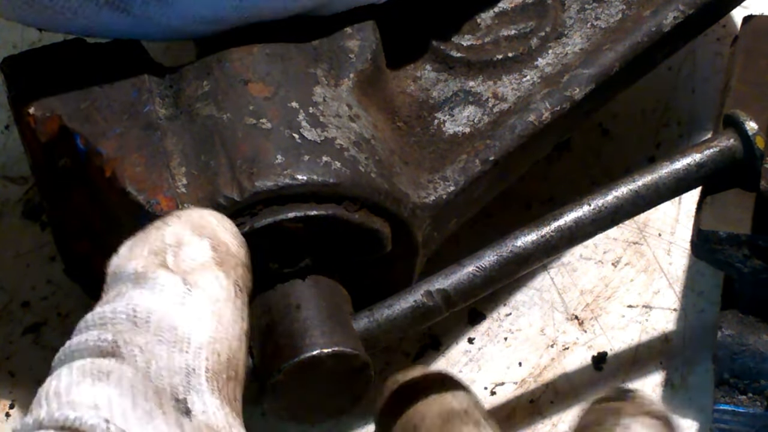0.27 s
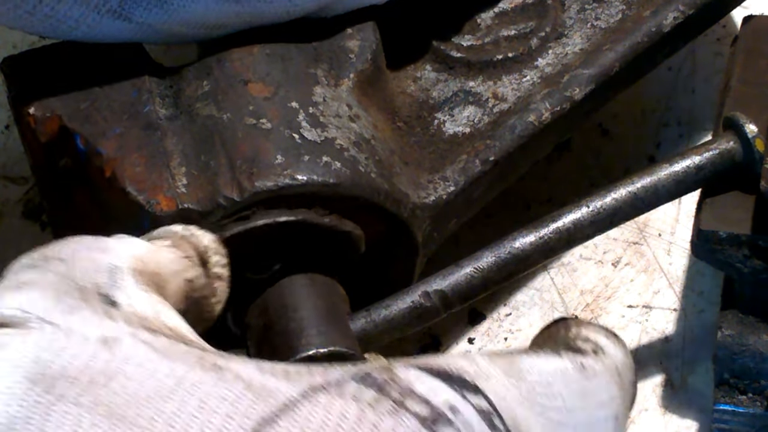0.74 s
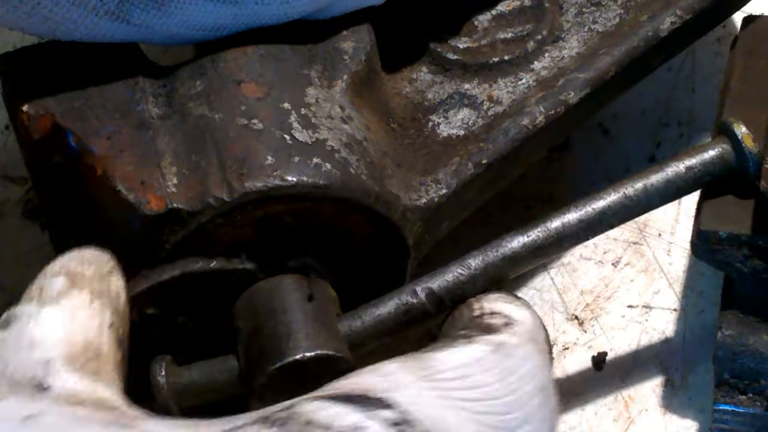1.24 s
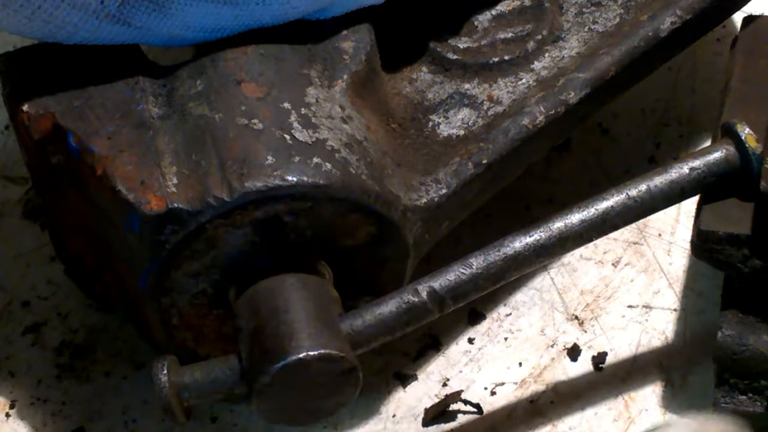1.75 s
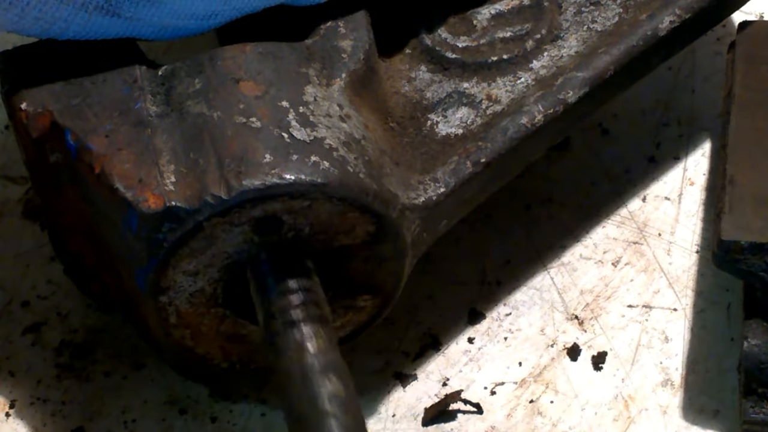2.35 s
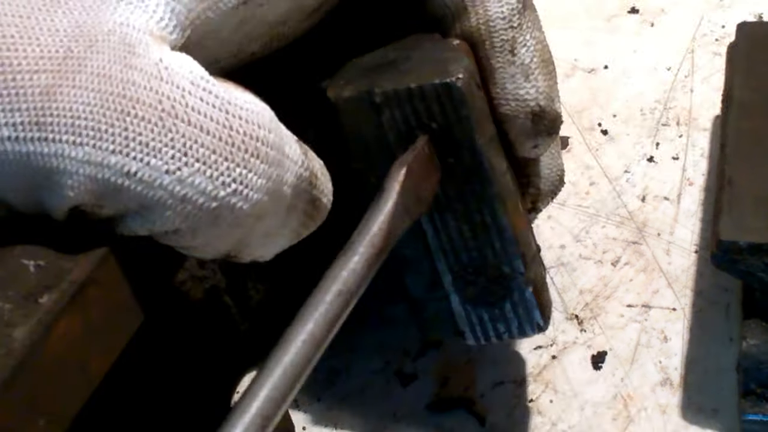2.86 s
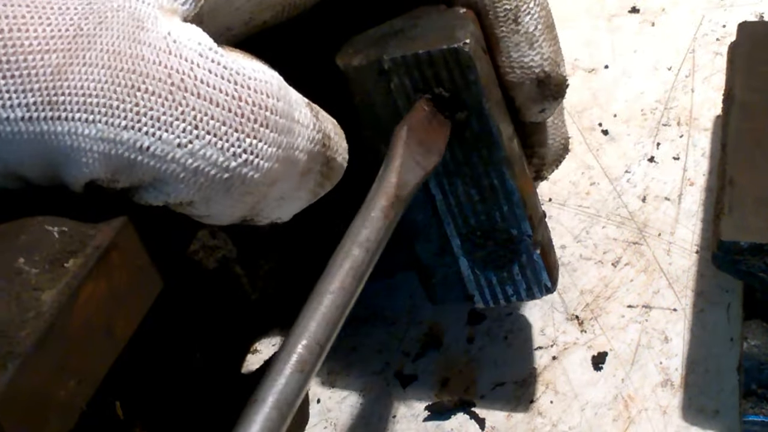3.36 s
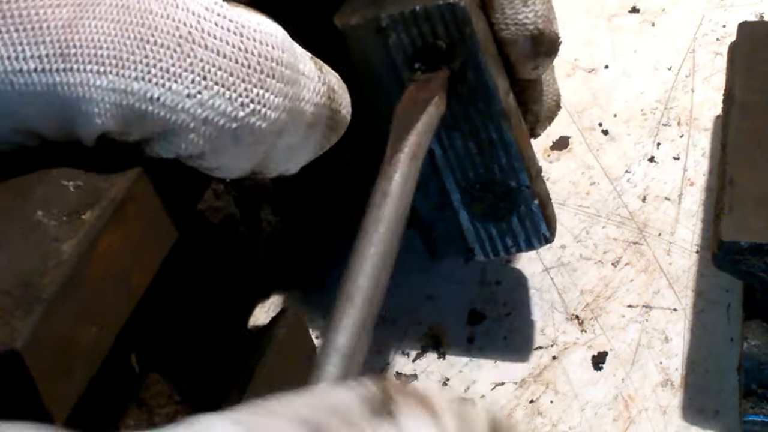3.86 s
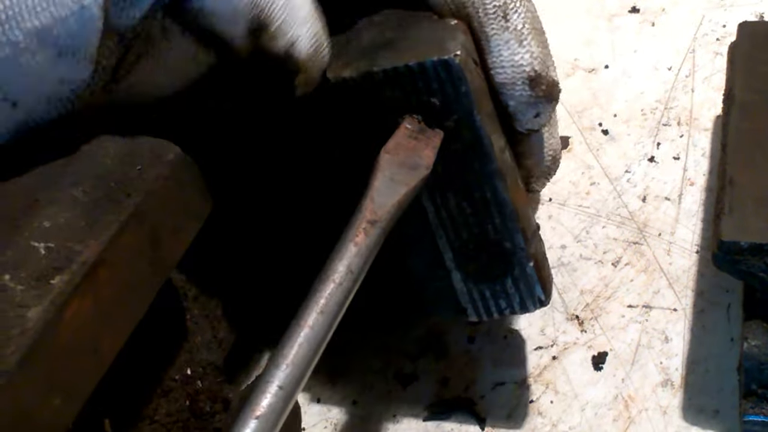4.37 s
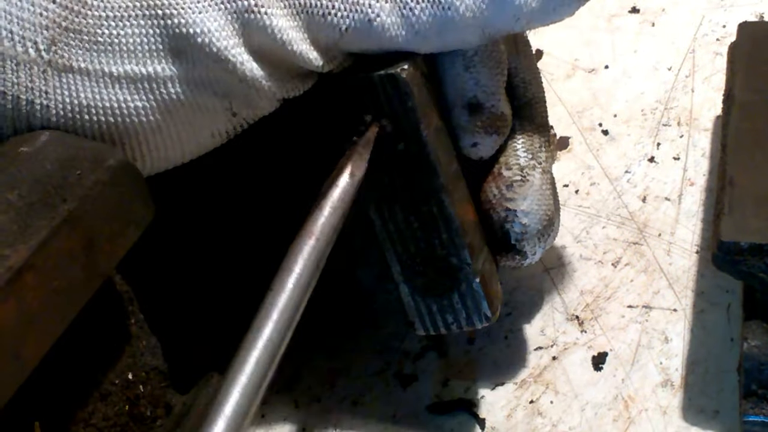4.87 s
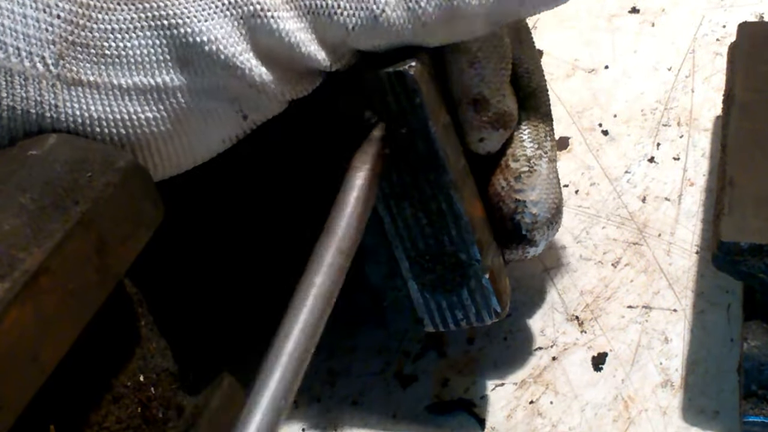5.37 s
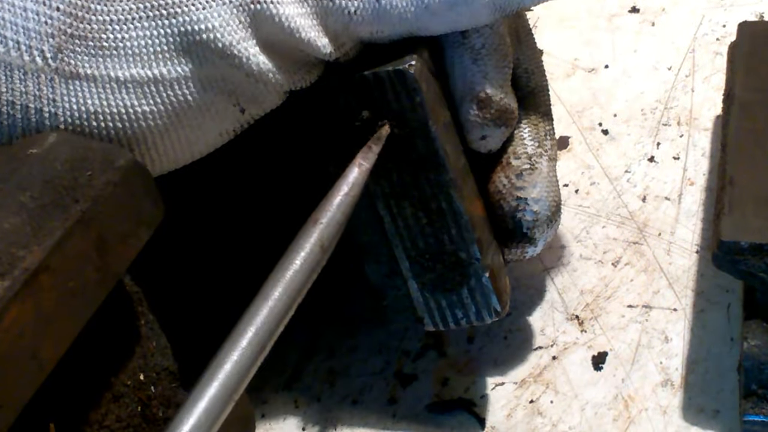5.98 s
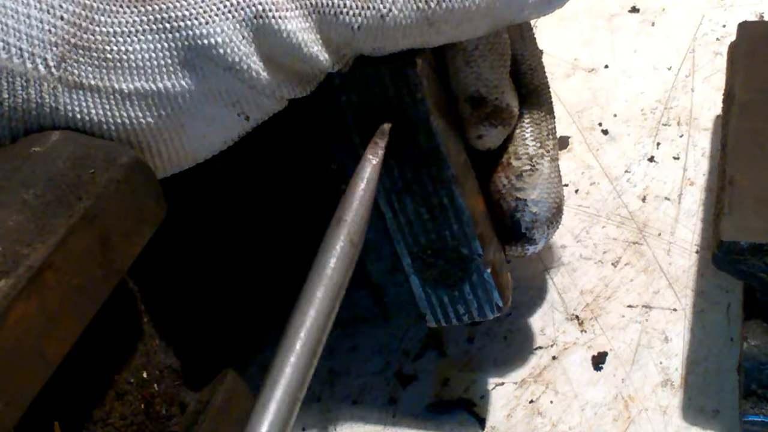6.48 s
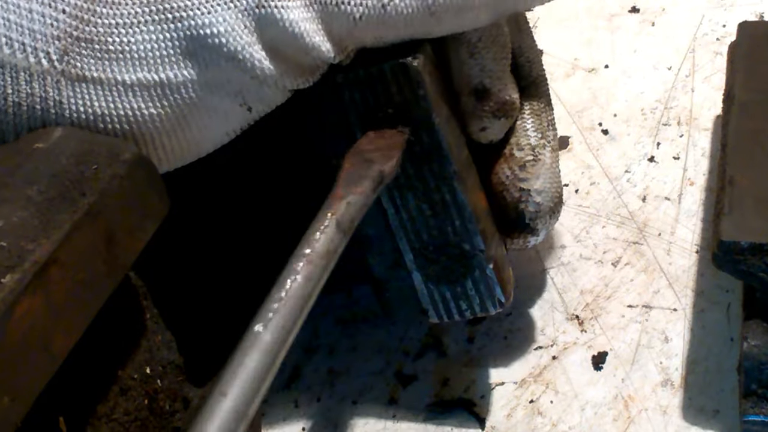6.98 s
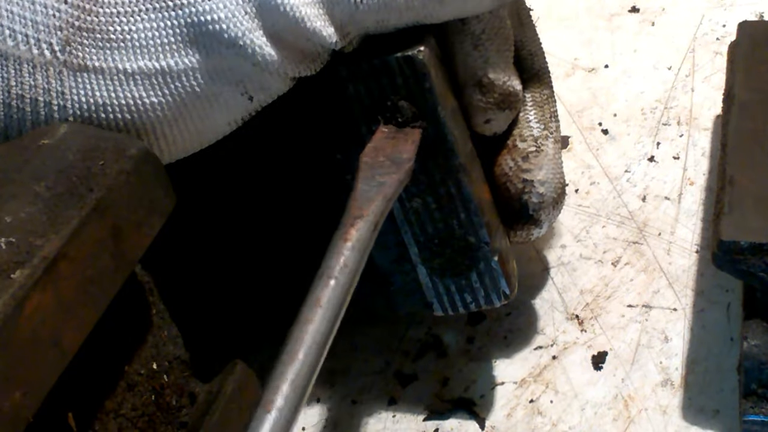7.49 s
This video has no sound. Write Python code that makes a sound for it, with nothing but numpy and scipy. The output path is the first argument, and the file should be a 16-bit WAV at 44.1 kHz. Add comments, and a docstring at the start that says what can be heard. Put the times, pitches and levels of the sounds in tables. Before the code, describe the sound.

Sharp metallic clatter over traffic rumble, then irregular clicks, dull wooden thuds and short gritty scrapes of a screwdriver tip on heavy iron.

```python
"""Vise and screwdriver on a bench

Gloved hands slide a washer and a screw out of a vise, then a screwdriver picks and scrapes at a serrated
steel jaw on a wooden bench. Blows are noise bursts and dying modes, strokes are filtered dense grit.
Behind them are four layers of street noise, gliding engine tones and faint electronic hiss."""
import sys
import numpy as np
from scipy import signal
from scipy.fft import rfft, irfft
from scipy.io import wavfile
from scipy.ndimage import uniform_filter1d

SR = 44100
rng = np.random.default_rng(int(sys.argv[2]) if len(sys.argv) > 2 else 0)


def pcm_store(signal):
    """Save signal as 16-bit PCM."""
    levels = np.round(np.clip(np.atleast_2d(signal), -1, 1) * 32767)
    wavfile.write(sys.argv[1], SR, levels.astype(np.int16).T)


N = 341334
# work goes from vise to loose jaw; the scene changes here and the street steps in level
MOVE_S = 2.79


def gain_of(db):
    """Decibels to amplitude."""
    return 10 ** (np.asarray(db) / 20)


def evened(x):
    """Scales to rms 1."""
    return x / np.sqrt(np.mean(x ** 2) + 1e-20)


def crest(x):
    """Scales a transient so that its loudest 300 samples have level 1, as a sine of amplitude 1."""
    return x / np.sqrt(2 * uniform_filter1d(x ** 2, size=300).max())


def wander(size, smooth):
    """Slow random curve of rms 1: noise averaged over smooth samples."""
    return evened(uniform_filter1d(rng.standard_normal(size), size=smooth))


def read(points, hz):
    """Reads a spectrum in dB on a log-frequency axis."""
    point_hz, point_db = np.transpose(points)
    return np.interp(np.log(hz + 1), np.log(point_hz + 1), point_db)


def shaped(x, points):
    """Filters x by a spectrum."""
    hz = np.fft.rfftfreq(len(x), 1 / SR)
    return irfft(rfft(x) * gain_of(read(points, hz)), len(x))


def add(mix, start_s, sound):
    """Mixes a sound in, cut at the end of the mix."""
    part = mix[round(start_s * SR):][:len(sound)]
    part += sound[:len(part)]


def ring(modes, detune, size):
    """Sum of exponentially dying sines, each pitch scaled by its detune factor."""
    t = np.arange(size) / SR
    out = np.zeros(size)
    for (hz, db, t60_s), factor in zip(modes, detune):
        out += gain_of(db - 60 * t / t60_s) * np.sin(2 * np.pi * hz * factor * t)
    return out


# Hand-damped steel, too many modes to count: envelopes of its knock and tick.
# Each row: frequency in Hz, relative density in dB per Hz.
KNOCK_SPECTRUM = [(500, -18), (900, 3), (1300, 5.5), (1800, 1.5), (2600, -2.5), (3800, -13.5),
                  (8000, -52.5)]
TICK_SPECTRUM = [(1800, -26), (3000, 5.5), (4000, 6), (5500, -1), (6500, -10), (7800, -24), (11000, -29.5),
                 (16000, -45.5)]
RISE_S, TICK_LAG_S = 0.0055, 0.001
SNAP_DB = 18  # one hard contact, re the rms of the tiny ones
JAW_PING_DB, VISE_PING_DB, PING_T60_S = -2, -7, 0.03  # heavy iron hardly pings


def steel(on_vise, knock_hz, burst, build):
    """Tiny contacts and a snap excite dense steel modes, one mode pings; the treble follows as the tip skids."""
    t = np.arange(len(burst)) / SR
    snap = gain_of(SNAP_DB) * (np.arange(len(t)) == round(RISE_S * SR))
    contacts = rng.standard_normal((2, len(t))) + snap
    ping = build * ring([(knock_hz, 0, PING_T60_S)], [1], len(t))
    ping_gain = gain_of(VISE_PING_DB if on_vise else JAW_PING_DB)
    knock = crest(shaped(contacts[0], KNOCK_SPECTRUM) * burst) + ping_gain * crest(ping)
    tick = shaped(contacts[1], TICK_SPECTRUM) * np.interp(t - TICK_LAG_S, t, burst)
    return knock, tick


# Jaw on wood, and vise body. Each row: frequency in Hz, relative density in dB per Hz.
JAW_ON_WOOD = [(140, -24), (250, 3), (400, -1.5), (600, -4), (850, -9.5), (1300, -26.5), (4000, -68)]
VISE_BODY = [(140, -40), (280, 1.5), (420, 2), (570, 8.5), (850, 1), (1300, -14.5), (4000, -66)]
# Modes of the vise body. Each row: frequency in Hz before detuning, relative level in dB, t60 in s.
VISE_MODES = [(330.5, -4, 0.028), (434, -2, 0.023), (590, -0.5, 0.028), (720, -4, 0.018)]
VISE_MODES_DB = -1  # re the body noise


def clonk_of(on_vise, burst, build):
    """The push rattles iron or wood, which dies later than the steel; the vise adds its own modes."""
    snap = gain_of(SNAP_DB) * (np.arange(len(burst)) == round(RISE_S * SR))
    contacts = rng.standard_normal(len(burst)) + snap
    clonk = crest(shaped(contacts, VISE_BODY if on_vise else JAW_ON_WOOD) * burst ** 0.65)
    if on_vise:
        detune = 1 + 0.023 * rng.standard_normal(len(VISE_MODES))
        modes = build * ring(VISE_MODES, detune, len(burst))
        clonk = clonk + gain_of(VISE_MODES_DB) * crest(modes)
    return clonk


# Bench top. Each row: share of the thud pitch, relative level in dB, t60 in s.
BENCH_TOP = [(1.048, 4.5, 0.086), (1.613, -4, 0.063), (0.735, -4.5, 0.11)]
# Low rumble around a blow. Each row: frequency in Hz before detuning, relative level in dB, t60 in s.
LOW_RUMBLE = [(58.5, -7, 0.26), (80, -8.5, 0.13)]
LOW_LAG_S = 0.003


def thud_and_rumble(thud_hz, size):
    """Modes of the bench top and a lower rumble build up over the push and start a little late."""
    slow = 1 - np.exp(-np.arange(size) / SR / (0.89 * RISE_S))
    top_modes = [(share * thud_hz, db, t60_s) for share, db, t60_s in BENCH_TOP]
    detune = 1 + 0.039 * rng.standard_normal(len(LOW_RUMBLE))
    thud = -slow * ring(top_modes, np.ones(len(BENCH_TOP)), size)
    rumble = -slow * ring(LOW_RUMBLE, detune, size)
    lag = round(LOW_LAG_S * SR)
    return [np.pad(part, (lag, 0))[:size] for part in (thud, rumble)]


# Each row: time in s (3 ms after onset), steel knock in dB, ping pitch in Hz, steel tick in dB,
# burst t60 in s, clonk in dB, bench thud in dB, thud pitch in Hz,
# low rumble around the blow in dB (for early and weak blows mostly traffic).
BLOWS = [(0.0912, -32.5, 2630, -34, 0.062, -53, -50, 137, -49),
         (0.0967, -29.5, 2730, -31.5, 0.038, -36.5, -61, 135, -48),
         (0.4092, -57, 2186, -52, 0.11, -64, -62, 102, -40.5),
         (1.462, -25.5, 3900, -36, 0.039, -14, -34, 209, -27),
         (1.4725, -38, 2600, -52, 0.035, -34, -60, 200, -55),
         (1.514, -19.5, 1106, -27.5, 0.06, -21, -31, 105, -34),
         (1.5403, -38.5, 895, -61, 0.18, -27.5, -51, 102, -29),
         (1.569, -36, 1296, -66, 0.037, -23.5, -50, 102, -28.5),
         (1.6054, -41.5, 1170, -76, 0.072, -35, -34, 167, -45),
         (1.64, -50, 1190, -77, 0.032, -40, -60, 160, -58),
         (1.6794, -27, 1348, -36.5, 0.064, -28.5, -37, 159, -41),
         (1.753, -37, 2310, -51, 0.16, -38, -49, 102, -33),
         (1.783, -36, 1790, -54, 0.061, -31.5, -40, 174, -41),
         (1.8143, -40, 844, -64, 0.041, -32.5, -40, 167, -42),
         (1.854, -69, 1160, -46.5, 0.11, -51, -41, 102, -42),
         (1.8926, -48, 1390, -55, 0.071, -46, -50, 135, -48),
         (2.0062, -46, 1324, -48, 0.27, -39.5, -55, 101, -43),
         (2.988, -55, 1170, -60, 0.058, -37, -24.5, 129, -39),
         (2.994, -46.5, 1555, -54, 0.079, -39, -23, 122, -22),
         (3.069, -74, 1150, -81, 0.031, -43.5, -28, 109, -25),
         (3.1554, -28, 1240, -37.5, 0.045, -35, -57, 101, -24.5),
         (3.181, -48, 1150, -50.5, 0.043, -36.5, -25, 110, -25.5),
         (3.4527, -37, 1860, -36, 0.052, -23, -10, 110.6, -12),
         (3.5495, -59, 1430, -62, 0.08, -57, -46.5, 151, -36),
         (3.621, -65, 1240, -56, 0.041, -60, -41, 109.5, -45),
         (3.729, -33.5, 1790, -34.5, 0.065, -24, -12, 156.6, -12),
         (3.772, -58, 1580, -66, .065, -45, -21.5, 96.5, -29),
         (3.843, -39.5, 1430, -65, 0.065, -51, -29, 98, -47),
         (3.857, -29, 1600, -60, 0.042, -34.5, -20.5, 110, -24),
         (4.0961, -45.5, 1190, -56, 0.028, -46, -37, 126, -28.5),
         (4.1329, -52, 1550, -72, 0.088, -46, -28, 135.5, -55),
         (4.1694, -52.5, 1760, -74, 0.093, -43, -26, 99, -51),
         (4.209, -62, 1415, -58, 0.057, -61, -39.5, 135, -55),
         (4.422, -51, 1390, -52, 0.15, -39.5, -24.5, 111, -43),
         (4.4417, -47, 1500, -61, 0.073, -50, -24.5, 93, -52),
         (4.6936, -54, 1990, -63, 0.13, -54, -55, 101, -34),
         (4.796, -43.5, 1150, -48.5, 0.066, -37.5, -19, 116, -19.5),
         (4.86, -26.5, 1545, -40, 0.043, -30.5, -24.5, 114, -20.5),
         (5.086, -51.5, 1220, -64, 0.071, -45, -63, 164, -33),
         (5.2132, -52.5, 2290, -60, 0.092, -61, -46, 99, -31),
         (5.243, -49, 1110, -49, 0.034, -55, -21, 110, -15.5),
         (5.253, -43.5, 1270, -56, 0.04, -37.5, -50, 103, -26),
         (5.3357, -32, 1430, -33.5, 0.035, -34.5, -28, 117, -23.5),
         (5.354, -54, 1140, -64, 0.039, -42, -32.5, 100, -22.5),
         (5.473, -45.5, 1360, -49.5, 0.062, -68, -53, 104, -31),
         (5.522, -55, 1740, -61, 0.091, -58, -55, 105, -44),
         (5.643, -36, 1930, -63, 0.043, -44, -53, 120, -34),
         (5.7285, -34, 2084, -34.5, 0.043, -42, -34, 132.5, -57),
         (5.8157, -43, 2140, -41, 0.05, -39.5, -29.5, 116, -21.5),
         (6.324, -51, 1510, -64, 0.03, -64, -34.5, 101, -51),
         (7.2541, -48.5, 1230, -52, 0.034, -43, -27, 102.5, -33.5),
         (7.266, -50.5, 1560, -58, 0.072, -48, -49, 101, -55),
         (7.399, -56, 1150, -64, 0.1, -39.5, -38.5, 157, -43),
         (7.414, -47, 1190, -58.5, 0.058, -45.5, -34, 105, -27.5)]


def blow(on_vise, knock_db, knock_hz, tick_db, t60_s, clonk_db, thud_db, thud_hz, rumble_db):
    """A burst of contacts sounds the steel, with a clonk, a bench thud and low rumble around it."""
    size = 8192
    t = np.arange(size) / SR
    build = np.sin(np.pi / 2 * np.minimum(t / RISE_S, 1)) ** 2
    burst = build * gain_of(-60 * np.maximum(t - RISE_S, 0) / t60_s)
    knock, tick = steel(on_vise, knock_hz, burst, build)
    clonk = clonk_of(on_vise, burst, build)
    thud, rumble = thud_and_rumble(thud_hz, size)
    levels_db = (knock_db, tick_db, clonk_db, thud_db, rumble_db)
    parts = (knock, tick, clonk, thud, rumble)
    fade = np.hanning(2 * size)[size:]
    return fade * sum(gain_of(db) * crest(part) for db, part in zip(levels_db, parts))


# Free washer. Each row: frequency in Hz, level in dB, t60 in s.
WASHER_MODES = [(3730, -38.5, 0.9), (7860, -45.5, 0.1), (15000, -67, 0.047)]
# In the air between two bounces: start in s, end in s.
AIRBORNE_S = (1.463, 1.513)
TURN_S = 0.019


def washer():
    """Free modes stopped by the next bounce; the lowest swells as the washer turns its face."""
    size = round((AIRBORNE_S[1] - AIRBORNE_S[0]) * SR)
    turn = np.minimum(np.arange(size) / SR / TURN_S, 1) ** 2
    lowest = turn * ring(WASHER_MODES[:1], [1], size)
    others = ring(WASHER_MODES[1:], [1, 1], size)
    return (lowest + others) * signal.windows.tukey(size, .2)


# Grit under the blade. Each row: frequency in Hz, relative density in dB per Hz.
GRIT_SPECTRUM = [(700, -15.5), (1000, -0.5), (5500, 1.5), (6500, -6), (7500, -16.5), (12000, -21.5),
                 (16000, -36.5)]
GLIDE, WAVER = 0.046, 0.087  # shares of the pitch: rise along a stroke, noise before smoothing
RIDGE_DB, RIDGE_OCTAVES, PATCHY_DB = -5, 0.069, 2  # ridge is 6 dB down at RIDGE_OCTAVES


def grit_of(grains, colour_hz):
    """Dense grains coloured by the angle of the tip: a moving peak, a narrow ridge, random patches."""
    _, _, z = signal.stft(grains, SR, nperseg=512)
    hz = np.fft.rfftfreq(512, 1 / SR)[:, None]
    along = np.linspace(-.5, .5, z.shape[1])
    waver = WAVER * uniform_filter1d(rng.standard_normal(len(along)), size=3)
    tone_hz = colour_hz * (1 + GLIDE * along + waver)
    octaves = np.log2((hz + 1) / tone_hz)
    slopes_db = np.where(octaves > 0, -6.5 * octaves, 9.2 * octaves)  # steeper below the tone
    ridge_db = RIDGE_DB - 6 * (octaves / RIDGE_OCTAVES) ** 2
    patches = uniform_filter1d(rng.standard_normal(z.shape), size=5, axis=0)
    patches = evened(uniform_filter1d(patches, size=3, axis=1))
    z = z * gain_of(read(GRIT_SPECTRUM, hz))
    z = z * (gain_of(slopes_db) + gain_of(ridge_db)) * gain_of(PATCHY_DB * patches)
    return signal.istft(z, SR, nperseg=512)[1][:len(grains)]


# Drag on the iron. Each row: frequency in Hz, relative density in dB per Hz.
DRAG_SPECTRUM = [(160, -32), (280, 5), (592, 9), (728, 2.5), (907, 1), (1200, -2), (1560, -55),
                 (2640, -120)]
# Each row: start in s, pressure peak in s, end in s, grit rms in dB, colour in Hz, drag rms in dB;
# both rms levels before pressure and catching.
STROKES = [(0.201, 0.253, .29, -55.5, 5100, -55), (0.289, 0.302, .335, -60, 3900, -66),
           (0.325, 0.35, .375, -57.5, 4140, -60), (.44, .455, .475, -62, 3060, -59),
           (0.589, 0.617, .66, -60, 3290, -55), (1.524, 1.523, 1.62, -59, 1130, -35.5),
           (1.69, 1.716, 1.75, -48.5, 3500, -41), (1.735, 1.765, 1.8, -49.5, 3300, -40.5),
           (1.801, 1.828, 1.93, -69, 1500, -49.5), (2.904, 2.941, 2.985, -62.5, 1400, -53.5),
           (3.145, 3.147, 3.157, -63, 1600, -46), (3.644, 3.656, 3.7, -60, 1200, -48.5),
           (3.824, 3.838, 3.86, -62, 3500, -61), (3.87, 3.87, 3.92, -63, 1120, -64),
           (3.905, 3.95, 3.99, -53.5, 2320, -72), (3.999, 4.03, 4.07, -62.5, 3360, -75),
           (4.095, 4.127, 4.2, -56.5, 1164, -44.5), (4.273, 4.3, 4.325, -59, 2500, -62),
           (4.316, 4.325, 4.385, -50.5, 2900, -61.5), (4.324, 4.34, 4.385, -52, 1230, -74),
           (4.355, 4.395, 4.44, -50, 1140, -60), (4.408, 4.445, 4.49, -49.5, 1500, -48.5),
           (4.479, 4.53, 4.66, -58.5, 2350, -59.5), (4.913, 4.944, 4.99, -57, 2840, -65),
           (4.998, 5.016, 5.035, -63.5, 3330, -71), (5.313, 5.328, 5.338, -56, 2980, -50),
           (5.36, 5.433, 5.46, -45.5, 1130, -54.5), (5.442, 5.464, 5.5, -52, 1370, -57),
           (5.627, 5.645, 5.65, -50.5, 1760, -56), (5.903, 5.958, 6.01, -56, 2510, -74),
           (6.432, 6.469, 6.515, -49.5, 2210, -62), (6.51, 6.547, 6.58, -51.5, 3050, -58.5),
           (6.806, 6.812, 6.84, -51.5, 3000, -80), (6.81, 6.845, 6.885, -50, 2310, -69),
           (6.87, 6.901, 6.93, -56, 3260, -91), (6.971, 6.985, 7.01, -62.5, 1490, -63),
           (7.049, 7.081, 7.1, -53, 2450, -61), (7.078, 7.11, 7.15, -48.5, 2260, -78),
           (7.15, 7.187, 7.22, -57, 3180, -72), (7.29, 7.34, 7.38, -62.5, 2240, -75),
           (7.681, 7.73, 7.76, -51, 2700, -65)]
PRESS_POWER, EASE_POWER = 0.89, 0.67  # pressure curvature before and after the peak


def stroke(start_s, peak_s, end_s, grit_db, colour_hz, drag_db):
    """Pressed to a peak and eased off, the blade scrapes grit over a duller drag, catching at random."""
    t = np.arange(start_s, end_s, 1 / SR)
    ramp = np.interp(t, (start_s, peak_s, end_s), (0, 1, 0))
    pressure = ramp ** np.where(t < peak_s, PRESS_POWER, EASE_POWER)
    grain_db = 3.0 * np.minimum(rng.exponential(1, len(t)), 5)
    grains = rng.standard_normal((2, len(t))) * gain_of(grain_db)
    catch_db = 1.5 * wander(len(t), 200)
    grit = evened(grit_of(grains[0], colour_hz)) * gain_of(grit_db)
    drag = evened(shaped(grains[1], DRAG_SPECTRUM)) * gain_of(drag_db)
    return (grit + drag) * gain_of(catch_db) * pressure


def shed(x):
    """Short sparse tail from bench and walls: random taps after 4 ms, dying 60 dB in 77 ms."""
    t = np.arange(6000) / SR
    sparse = rng.standard_normal(len(t)) * (rng.random(len(t)) < .05)
    taps = sparse * gain_of(-60 * t / 0.077) * (t > .004)
    return signal.oaconvolve(x, taps / np.linalg.norm(taps))[:N]


# Traffic engine tones. Each row: start in s, end in s, start Hz, end Hz, start rms in dB, end rms in dB.
ENGINE_TONES = [(1.27, 1.66, 45.6, 49.8, -32, -34.5), (1.707, 1.91, 57, 39, -32.5, -22.5),
                (1.9, 2.79, 59, 49, -25, -34), (1.62, 1.9, 184, 180, -43.5, -41),
                (0.087, 0.295, 170, 180, -47.5, -47.5), (0.59, 0.693, 340, 240, -44.5, -53),
                (.85, 1.055, 180, 170, -45, -49.5), (6.42, 6.85, 42, 54.8, -44.5, -41),
                (1.7, 2.08, 162, 185, -48, -43.5), (1.25, 1.7, 110, 82, -44, -44),
                (2.14, 2.23, 110, 98, -30.5, -32.5), (2.2, 2.64, 160, 180, -49.5, -43)]
SWELL_S = 0.058  # fade at each end


def engine():
    """Sines glide in pitch and level, wavering a little in pitch."""
    out = np.zeros(N)
    for start_s, end_s, from_hz, to_hz, from_db, to_db in ENGINE_TONES:
        t = np.arange(0, end_s - start_s, 1 / SR)
        u = t / (end_s - start_s)
        hz = (from_hz + (to_hz - from_hz) * u) * (1 + 0.021 * wander(len(t), 2000))
        tone = np.sqrt(2) * np.sin(2 * np.pi * np.cumsum(hz) / SR)
        swell = np.minimum(np.minimum(t, t[::-1]) / SWELL_S, 1)
        add(out, start_s, swell * gain_of(from_db + (to_db - from_db) * u) * tone)
    return out


# Street layers. Each row: frequency in Hz, relative density in dB per Hz.
RUMBLE_SPECTRUM = [(8.8, -52), (15, 4), (21, -1.5), (35, 1), (49, -2), (65, 2.5), (86, -14), (110, -12),
                   (140, -20), (240, -120)]
MOTOR_SPECTRUM = [(47, -19.5), (80, -11.5), (105, -2.5), (140, -8), (173, -7.5), (236, -8), (349, -21.5),
                  (398, -17.5), (560, -30.5), (730, -41), (1230, -120)]
TYRE_SPECTRUM = [(280, -26), (430, -0.5), (600, -4.5), (720, -3.5), (790, 2.5), (900, -5.5), (1010, -3.5),
                 (1180, -7.5), (1380, -8), (1600, -11.5), (2000, -19), (2600, -41), (4400, -120)]
HISS_SPECTRUM = [(760, -28.5), (1300, -5), (1480, 1), (1660, -1.5), (2670, -6.5), (3090, -5), (5270, -6.5),
                 (7120, -23.5), (9000, -46), (11700, -77), (19800, -120)]
# Steady street, one row per scene: rumble, motor noise, tyre roar, distant hiss, all in dB; # the second row
# holds from MOVE_S.
STEADY_DB = [(-37.5, -49.5, -78, -68.5), (-36.5, -51, -74, -71.5)]
# Drift in the second scene: rumble, motor noise, tyre roar, distant hiss, all in dB per s.
DRIFT_DB_PER_S = (-0.91, -2.3, 0.13, 0.54)
# Passing vehicles. Each row: nearest time in s, passing time in s, then at nearest
# rumble, motor noise, tyre roar, distant hiss, all in dB.
PASSES = [(0.95, 0.36, -33.5, -45, -57.5, -67.5), (1.55, 0.42, -41, -45.5, -52.5, -60.5),
          (2.25, 0.65, -53, -43.5, -58.5, -59.5), (6.1, 1, -52.5, -50, -84.5, -75.5),
          (6.2, 0.2, -55, -55, -55, -79)]


def street():
    """Four fluttering noise layers: a steady street plus vehicles that swell as they come near."""
    t, out = np.arange(N) / SR, np.zeros(N)
    moved = t > MOVE_S
    for k, points in enumerate((RUMBLE_SPECTRUM, MOTOR_SPECTRUM, TYRE_SPECTRUM, HISS_SPECTRUM)):
        second_db = STEADY_DB[1][k] + DRIFT_DB_PER_S[k] * (t - MOVE_S)
        power = gain_of(np.where(moved, second_db, STEADY_DB[0][k])) ** 2
        for near_s, span_s, *level_db in PASSES:
            swell = gain_of(level_db[k]) / (1 + ((t - near_s) / span_s) ** 2)
            power = power + (moved == (near_s > MOVE_S)) * swell ** 2  # heard only in its own scene
        layer = evened(shaped(rng.standard_normal(N), points))
        out += layer * np.sqrt(power) * gain_of(.5 * wander(N, 3000))
    return out


def scene():
    """Hands at the bench over the street."""
    hits, rubs = np.zeros(N), np.zeros(N)
    for time_s, *how in BLOWS:
        add(hits, time_s - .003, blow(time_s < MOVE_S, *how))
    add(hits, AIRBORNE_S[0], washer())
    for row in STROKES:
        add(rubs, row[0], stroke(*row))
    tail = gain_of(-35) * shed(hits)
    return (hits + rubs + tail + engine() + street())[None]


# Electronic hiss. Each row: frequency in Hz, relative density in dB per Hz.
SELF_NOISE_SPECTRUM = [(4120, -10.5), (7000, -6.5), (8530, -8), (9170, -9), (13500, -5.5), (15800, -11)]
SELF_NOISE_DB, EDGE_HZ = -79.5, 15720  # rms before the band limit, low-pass edge


def record(dry):
    """Adds electronic hiss, then a steep linear-phase low-pass."""
    hiss = gain_of(SELF_NOISE_DB) * evened(shaped(rng.standard_normal(N), SELF_NOISE_SPECTRUM))
    low_pass = signal.firwin(1023, EDGE_HZ, window=("kaiser", 9), fs=SR)
    return signal.oaconvolve(dry + hiss, low_pass[None], "same")


dry = scene()
out = record(dry)
pcm_store(out)
```